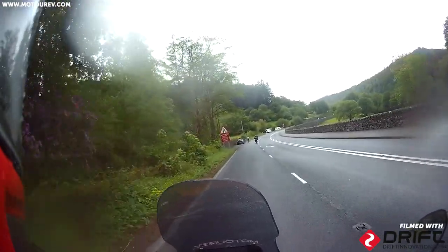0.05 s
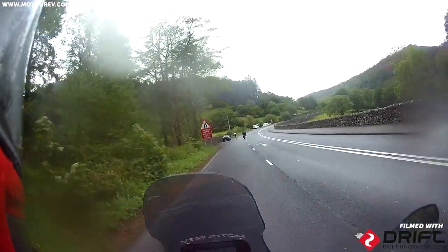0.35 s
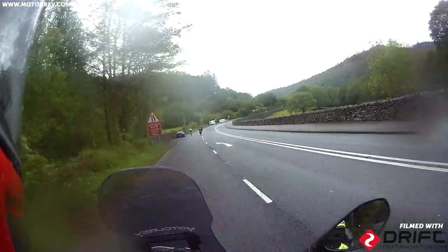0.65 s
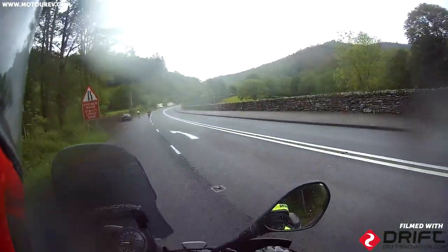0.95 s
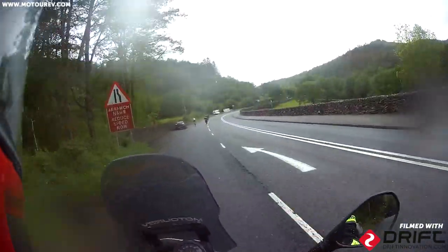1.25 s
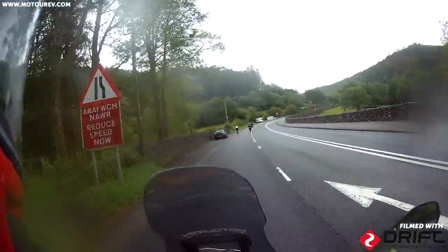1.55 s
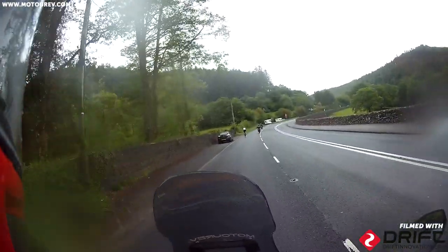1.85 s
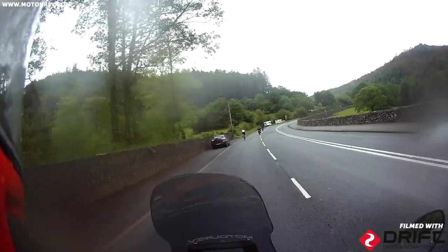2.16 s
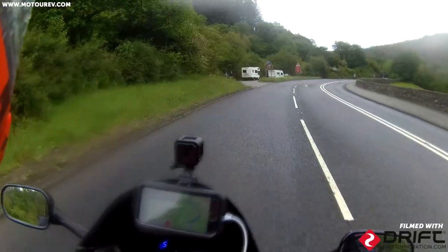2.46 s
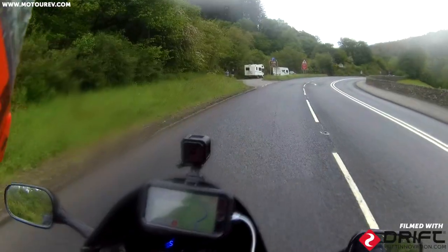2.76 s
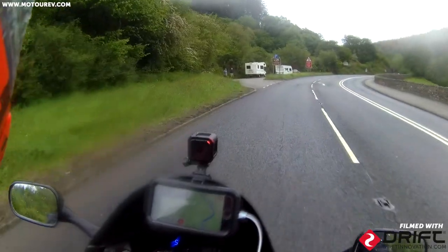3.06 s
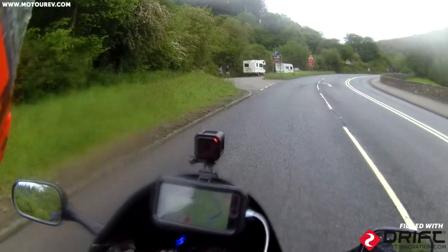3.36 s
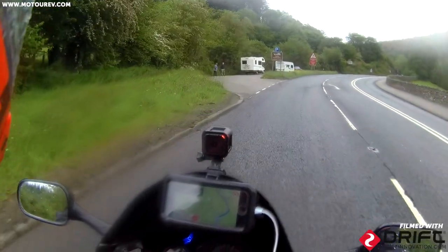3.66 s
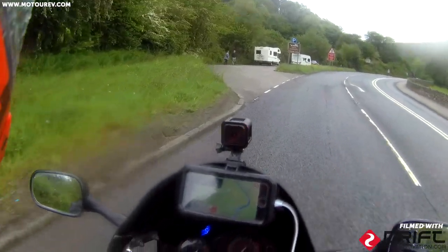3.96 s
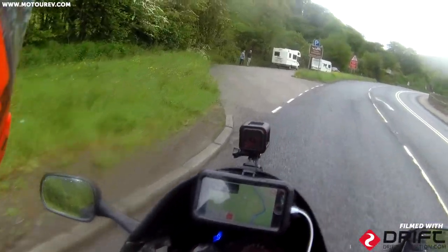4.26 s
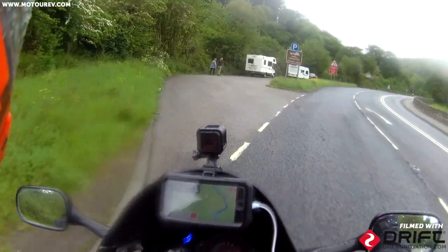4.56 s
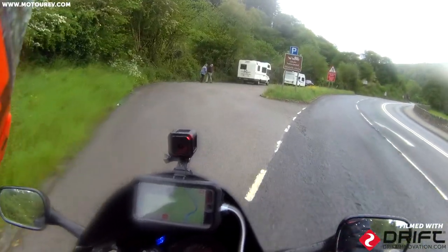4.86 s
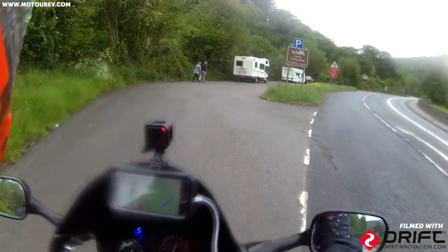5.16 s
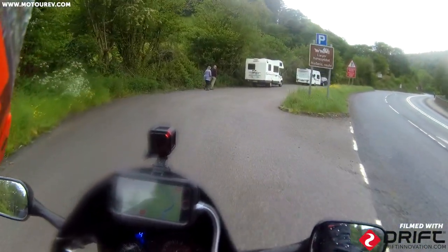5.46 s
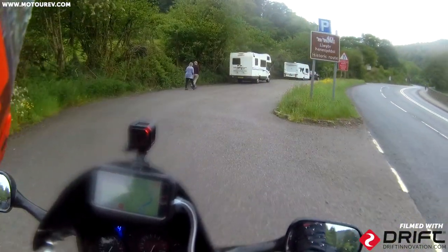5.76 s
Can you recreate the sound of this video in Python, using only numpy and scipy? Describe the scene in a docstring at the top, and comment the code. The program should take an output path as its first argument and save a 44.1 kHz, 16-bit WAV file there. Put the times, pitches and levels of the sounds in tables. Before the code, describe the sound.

Wind buffets over a motorcycle's tyre roar, with two brief engine swells and a few bumps, softening as it slows.

```python
"""A motorcycle rolls along a country road, heard from on board, and slows for a lay-by.
From the start, wind thumps and rushes over the roar of the tyres, and loose fittings tick.
At 1.3 s the engine's drone swells lightly. Bumps thud just after 2 s, then the engine
swells again and rises in pitch, as for a downshift. More bumps follow at 3.3 s and after 4 s.
By the end the bike is down to about half speed: wind and tyres are softer, and a low thrum has sunk."""
import sys
import numpy as np
from scipy import signal
from scipy.io import wavfile

SR = 44100
rng = np.random.default_rng(int(sys.argv[2]) if len(sys.argv) > 2 else 0)


def persist_wave(psi):
    """Save psi, clipped to +-1, as 16-bit WAV."""
    counts = np.round(np.clip(psi, -1, 1) * 32767).astype(np.int16)
    wavfile.write(sys.argv[1], SR, np.atleast_2d(counts).T)


N = 256220
TIME = np.arange(N) / SR

# The tone of the wind's rumble, rush and hiss. Each row: frequency in Hz, relative level in dB.
BUFFET_SPECTRUM = [(20, -0.7), (35, -1.5), (65, 1), (120, 0), (170, -4.5), (260, -15), (500, -37.5)]
RUSH_SPECTRUM = [(90, -16.5), (160, -3), (230, 3), (330, -4.5), (430, -6.5), (520, -11.5), (700, -13),
                 (1200, -41)]
HISS_SPECTRUM = [(1200, -30), (2500, -0.5), (3500, 7.5), (4400, -3.5), (5100, -2), (5800, -2), (7500, 0),
                 (9800, -3), (11500, -13), (13000, -12.5), (15000, -36)]
# Small rises and dips of the hiss. Each row: time in seconds, added level in dB.
HISS_SWELLS = [(0, 0.5), (.23, 2), (.27, -2), (.36, 1), (.45, 2), (1.1, 1), (1.6, 0.4), (2.2, -0.7),
               (2.55, -0.2), (3.0, -0.4), (3.5, 1), (4.7, 0.8), (5.81, 0.5)]
# Air whistling through gaps. Each row: pitch in Hz, width in Hz, level in dB against the hiss.
GAP_WHISTLES = [(2340, 340, -9), (3300, 420, -24), (5520, 1100, -10.5), (7240, 580, -20), (9700, 1700, -11),
                (12200, 930, -20)]


def wind(speed):
    """Big swirls of air rumble, smaller ones rush, and the hiss flutters as air tears off the edges."""
    buffet_gust_db, rush_gust_db = gusts()
    buffet = turbulence(BUFFET_SPECTRUM, patchy_db=1.0, eddies_per_s=27)
    buffet *= from_db(-28 + buffet_gust_db) * speed ** 1.16
    rush = turbulence(RUSH_SPECTRUM, patchy_db=0.47, eddies_per_s=25)
    rush *= from_db(-31 + rush_gust_db) * speed ** 1.73   # the highest power: fades most as we slow
    swell_db, = in_time(HISS_SWELLS)
    flutter_db = 0.55 * drift(22) + 0.5 * drift(90)
    hiss = turbulence(HISS_SPECTRUM, patchy_db=1.0, eddies_per_s=70) + ringing_noise(GAP_WHISTLES)
    hiss *= from_db(-51.5 + swell_db + flutter_db) * speed ** 1.34
    return buffet + thumps() + rush + hiss


# Gusts and lulls. Each row: middle in seconds, half length in seconds, dB added to the
# wind's rumble, dB added to its rush.
GUSTS = [(0.018, 0.08, 5, 0), (0.56, 0.099, 3, 2), (1.054, 0.2, 2, 1.5), (1.549, 0.23, 0.5, -1),
         (2.102, 0.28, 3, -0.5), (3.28, 0.14, -1, -2), (3.694, .1, -1, 0), (4.009, 0.14, 2, 2.5),
         (4.295, 0.097, 3, 0)]


def gusts():
    """The wind swells and dips smoothly; gives the dB to add to its rumble and to its rush."""
    buffet_gust_db = rush_gust_db = 0
    for middle, half_s, buffet_db, rush_db in GUSTS:
        buffet_gust_db += buffet_db * swell(middle, half_s)
        rush_gust_db += rush_db * swell(middle, half_s)
    return buffet_gust_db, rush_gust_db


# Single swirls of air. Each row: middle in seconds, relative level in dB, pitch in Hz.
WIND_THUMPS = [(0.057, -26, 87), (.155, -23, 85), (0.296, -16, 121), (0.535, -17, 135), (0.624, -14.5, 110),
               (0.707, -13.5, 135), (0.998, -14, 140), (1.077, -24, 90), (1.134, -14.5, 165),
               (1.204, -19.5, 90), (1.432, -31, 75), (1.568, -19, 90), (1.635, -15, 120), (1.982, -16, 105),
               (2.567, -20, 120), (2.696, -17.5, 69.6), (2.986, -18, 100), (3.047, -20, 85),
               (3.215, -22.5, 115), (3.272, -19.5, 135), (3.351, -14, 140), (3.443, -26, 105),
               (3.548, -17, 120), (4.073, -19, 130), (4.344, -18, 105), (4.757, -24, 90),
               (5.634, -19.5, 89.5)]


def thumps(half_cycles=0.75, gain_db=-3):
    """A swirl of air strikes the microphone: a soft, low pulse a cycle or two long."""
    return sum(from_db(db + gain_db) * swell(middle, half_cycles / hz) * sine(hz, middle)
               for middle, db, hz in WIND_THUMPS)


# How fast the engine runs. Each row: time in seconds, firings per second.
ENGINE_REVS = [(1.3, 161.2), (1.58, 163.9), (2.255, 135.9), (2.315, 167.7), (2.39, 174.8), (2.45, 165.3),
               (2.52, 178.5), (2.74, 181), (2.81, 202.8), (2.9, 202.4), (2.99, 176.4)]
# The tones in its drone. Each row: multiple of the firing rate, relative level in dB.
ENGINE_TONES = [(.5, -19), (1, -1.5), (1.5, -26.5), (2, -18), (3, -28.5)]


def engine(jitter=0.0065, rough_db=0.8, uneven_db=2.0):
    """Uneven firings blur into a muffled drone, heard only while the throttle is open."""
    firing_hz, = in_time(ENGINE_REVS)
    firings = np.cumsum(firing_hz * (1 + jitter * drift(25))) / SR
    strength_db = uneven_db * np.interp(firings, np.arange(2000), rng.standard_normal(2000))
    drone = 0
    for multiple, db in ENGINE_TONES:
        level = from_db(db + rough_db * multiple * drift(19))
        drone += level * np.sqrt(2) * np.sin(2 * np.pi * multiple * firings)
    rev_gain = (firing_hz / 176) ** 0.42   # louder as the revs rise
    return throttle() * rev_gain * from_db(strength_db) * drone


# A light twist of the throttle, then a firm one. Each row: start in seconds, length in seconds,
# relative level in dB.
THROTTLE_TWISTS = [(1.283, 0.34, -30), (2.22, 0.78, -24.5)]


def throttle(attack_s=0.023, release_s=0.071):
    """Each twist brings the engine's sound in quickly, holds it and eases it off."""
    gain = 0
    for start, length, db in THROTTLE_TWISTS:
        opening = (TIME - start) / attack_s
        closing = (start + length - TIME) / release_s
        gain += from_db(db) * np.clip(np.minimum(opening, closing), 0, 1)
    return gain


# The tone of the tyre roar. Each row: frequency in Hz, relative level in dB.
ROAR_SPECTRUM = [(400, -13), (650, -2), (900, 2), (1250, -2), (1550, -8), (2200, -11), (3000, -22),
                 (5000, -26.5)]
# Hollows in tyres and bodywork. Each row: pitch in Hz, width in Hz, level in dB against the roar.
HOLLOW_RINGS = [(836.4, 60, -8), (1206, 145, -8.5), (408.7, 37, -8.5), (1806, 220, -19)]


def tyres(speed):
    """The tread drums on the asphalt and rings in a few hollows."""
    roar = turbulence(ROAR_SPECTRUM, patchy_db=0, eddies_per_s=16)
    return from_db(-38) * speed ** 1.29 * (roar + ringing_noise(HOLLOW_RINGS))


# Bumps in the road. Each row: start in seconds, relative level in dB.
ROAD_BUMPS = [(2.097, -12), (2.14, -24), (2.178, -13), (3.277, -12), (4.246, -17), (4.268, -13),
              (4.38, -19), (4.471, -15)]


def bumps(thud_hz=48, decay_s=0.009, gain_db=-3):
    """Each jolt gives the frame one short, low swing."""
    return sum(from_db(db + gain_db) * burst(start, decay_s) * sine(thud_hz, start)
               for start, db in ROAD_BUMPS)


def thrum(speed, cruising_hz=83.5, wander=0.0318, rough_db=2.0):
    """A low, unsteady vibration that sinks as the wheels slow."""
    cycles = np.cumsum(cruising_hz * speed * (1 + wander * drift(5.7))) / SR
    level = from_db(-41 + rough_db * drift(6.1)) * speed ** 0.82
    return level * np.sqrt(2) * np.sin(2 * np.pi * cycles)


# The hum of the moving parts. Each row: pitch in Hz, width in Hz, level in dB.
WHIRR_BANDS = [(85, 43, -41.5), (265, 115, -45), (2430, 520, -61), (3600, 1540, -62.5), (5640, 860, -75)]


def whirr():
    """The running gear and chain hum and whirr steadily."""
    return ringing_noise(WHIRR_BANDS)


# Loose fittings. Each row: start in seconds, knock level in dB, rattle level in dB,
# rattle pitch in Hz, fade time in seconds.
FITTING_TICKS = [(0.2395, -44, -46, 10500, .0022), (0.459, -40, -62, 6000, .003),
                 (0.5667, -39, -39, 7300, .0025), (0.6575, -50, -47, 8000, .002),
                 (0.708, -42, -46, 9500, .0027), (0.869, -38.5, -54, 3510, 0.0025),
                 (1.821, -48, -47, 9800, .0024), (2.565, -52, -47, 6500, .003),
                 (2.9045, -48, -60, 6996, .003), (3.069, -45, -49, 7200, 0.0034),
                 (3.255, -44, -57, 8000, .003), (3.2728, -44, -45, 9500, .002),
                 (3.379, -52, -50, 7000, .003), (3.559, -49, -60, 6000, .003),
                 (3.5675, -52, -54, 11500, .0018), (3.707, -46, -53, 8500, .003),
                 (3.8325, -42, -51, 7000, .0025), (4.548, -47, -52, 6500, 0.0082),
                 (4.783, -52, -52, 6200, .003), (4.866, -46, -57, 6500, .004)]


def ticks(rattle_width_hz=4200):
    """Each loose fitting gives a short, dull knock with a bright rattle of its own on top."""
    knock = ringing_noise([(2600, 1600, 0), (1700, 800, -1)])
    out = 0
    for start, knock_db, rattle_db, hz, decay_s in FITTING_TICKS:
        rattle = ringing_noise([(hz, rattle_width_hz, rattle_db)])
        out += burst(start, decay_s) * (from_db(knock_db) * knock + rattle)
    return out


def grit(speed, cruising_hits_per_s=14, hz=10500, width_hz=5000, decay_s=0.0006):
    """The tyres fling specks of grit at the bodywork, each landing with a tiny, bright tick."""
    hits = rng.random(N) < cruising_hits_per_s * speed / SR
    strength = from_db(-50 + 3 * np.clip(rng.standard_normal(N), -2, 1))
    fades = signal.lfilter([1], [1, -np.exp(-1 / (decay_s * SR))], hits * strength + 1e-18)
    return speed * fades * ringing_noise([(hz, width_hz, -4)])


# Faint squeaks. Each row: middle in seconds, half length in seconds, pitch in Hz, width in Hz,
# level in dB.
FAINT_SQUEAKS = [(1.42, .13, 10080, 200, -65), (1.42, .13, 5250, 200, -62),
                 (2.565, 0.035, 6450, 350, -57.5), (2.6, .15, 9500, 1400, -62)]


def squeaks():
    """Thin, airy squeaks swell and fade inside the hiss."""
    return sum(swell(middle, half_s) * ringing_noise([(hz, width_hz, db)])
               for middle, half_s, hz, width_hz, db in FAINT_SQUEAKS)


def turbulence(spectrum, patchy_db, eddies_per_s):
    """Churning noise: each narrow band wavers by about patchy_db with its own eddies (swirls)."""
    points_hz, points_db = np.transpose(spectrum)
    edges_hz = 18 * 2 ** (np.arange(31) / 3)   # three bands to the octave
    white = rng.standard_normal((2, N))   # neighbouring bands take different noise
    out = 0
    for k, (low, high) in enumerate(zip(edges_hz, edges_hz[1:])):
        eddies = rng.standard_normal(2000)
        if points_hz[0] < high and low < points_hz[-1]:
            band_filter = signal.butter(2, [low, high], "band", fs=SR, output="sos")
            band = signal.sosfilt(band_filter, white[k % 2])
            band_db = np.interp(np.log(np.sqrt(low * high)), np.log(points_hz), points_db)
            waver = np.interp(TIME * eddies_per_s, np.arange(len(eddies)), eddies)
            out += band * from_db(band_db + patchy_db * waver)
    return rms_one(out)


def ringing_noise(bands):
    """Noise that rings around a few pitches, each given as (pitch in Hz, width in Hz, level in dB)."""
    out = 0
    for hz, width_hz, db in bands:
        once = resonate(rng.standard_normal(N), hz, 1.4 * width_hz)
        twice = resonate(once, hz, 1.4 * width_hz)   # a second pass narrows the band
        out += from_db(db) * rms_one(twice)
    return out


def resonate(x, hz, width_hz):
    """Let one pitch through at full strength and weaken the rest."""
    r = np.exp(-np.pi * width_hz / SR)
    feedback = [1, -2 * r * np.cos(2 * np.pi * hz / SR), r * r]
    return signal.lfilter(np.array([1, 0, -1]) * (1 - r * r) / 2, feedback, x + 1e-18)


def drift(rate):
    """A smooth random wobble of size about 1, changing about rate times a second."""
    r = np.exp(-80 * np.pi * rate / SR)
    noise = rng.standard_normal(N // 40 + 2002)   # one value for every 40 samples
    slow = signal.lfilter([1], [1, -2 * r, r * r], noise)[2000:]
    return np.interp(np.arange(N) / 40, np.arange(len(slow)), rms_one(slow))


def burst(start, decay_s):
    """A level that jumps to 1 and dies away."""
    return (TIME >= start) * np.exp(-np.minimum(np.abs(TIME - start) / decay_s, 60))


def swell(middle, half_s):
    """A level that rises smoothly to 1 and falls again."""
    return np.exp(-((TIME - middle) / half_s) ** 2)


def sine(hz, zero_s):
    """A pure tone that rises through zero at zero_s."""
    return np.sin(2 * np.pi * hz * (TIME - zero_s))


def in_time(rows):
    """Join a table's points in time with straight lines."""
    times, *columns = np.transpose(rows)
    return [np.interp(TIME, times, column) for column in columns]


def from_db(db):
    """Turn decibels into a number to multiply by."""
    return 10 ** (np.asarray(db) / 20)


def rms_one(x):
    """Scale a sound to an average strength (rms) of 1."""
    return x / np.sqrt(np.mean(x ** 2) + 1e-20)


# Slowing for the lay-by. Each row: time in seconds, road speed (1 is cruising speed).
ROAD_SPEED = [(0, 1.14), (.3, 0.95), (1.7, 0.88), (2.8, 0.81), (3.6, 0.71), (4.8, 0.62), (5.81, 0.52)]


def scene():
    """Everything travels with the microphone; the road speed drives wind, tyres, thrum and grit."""
    speed, = in_time(ROAD_SPEED)
    bike = engine() + whirr() + thrum(speed) + ticks() + grit(speed) + squeaks() + bumps()
    return (wind(speed) + tyres(speed) + bike)[None]


# Pitches the microphone's housing weakens. Each row: pitch in Hz, width in Hz, depth from 0 to 1.
HOUSING_NOTCHES = [(5110, 280, 0.27), (6870, 250, 0.06), (7760, 230, 0.1)]


def record(dry, cutoff_hz=15000):
    """The housing takes narrow dips out of the treble, and the very top is cut off steeply."""
    for hz, width_hz, depth in HOUSING_NOTCHES:
        dry = dry - depth * resonate(dry, hz, width_hz)
    return signal.sosfilt(signal.ellip(10, 0.2, 80, cutoff_hz, fs=SR, output="sos"), dry)


dry = scene()
out = record(dry)
persist_wave(out)
```